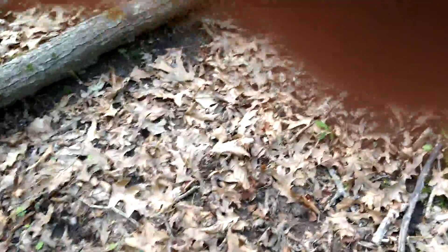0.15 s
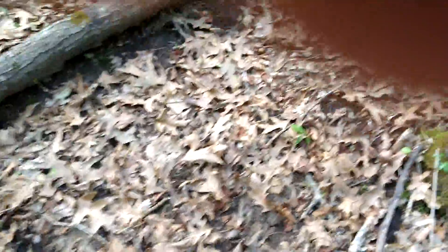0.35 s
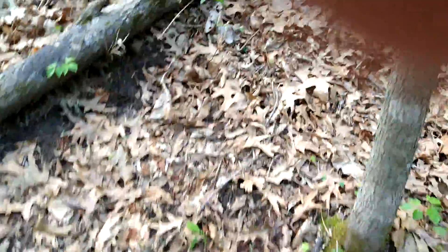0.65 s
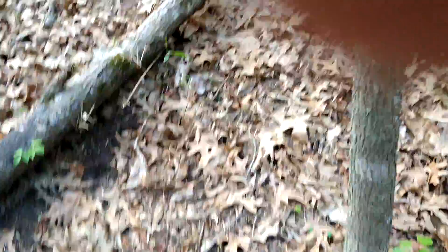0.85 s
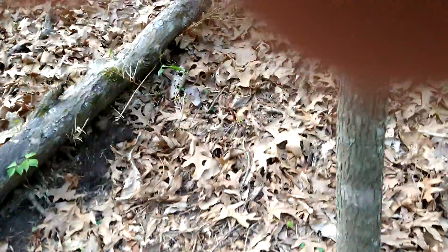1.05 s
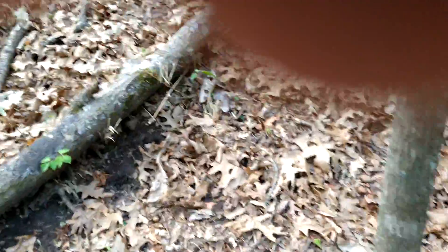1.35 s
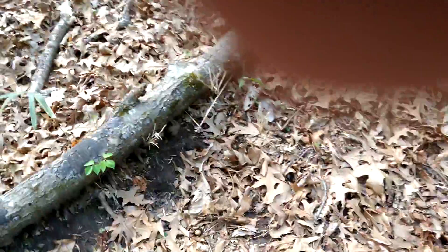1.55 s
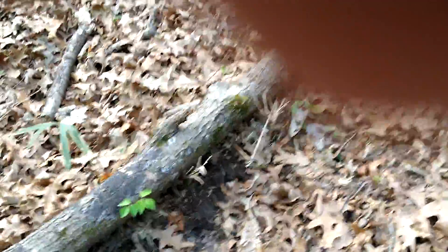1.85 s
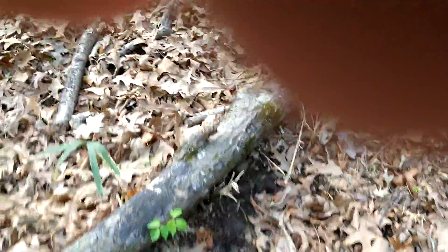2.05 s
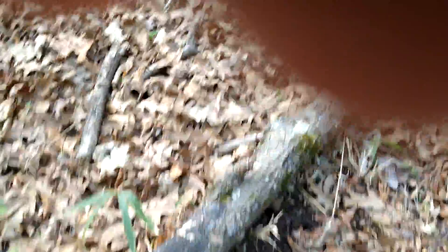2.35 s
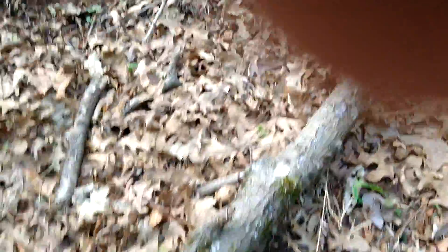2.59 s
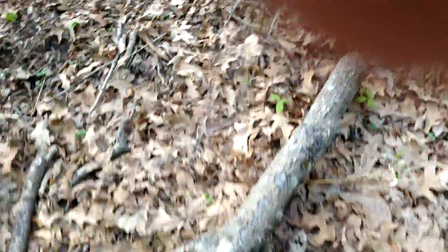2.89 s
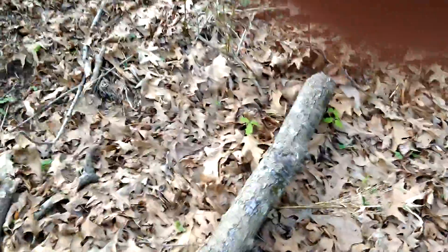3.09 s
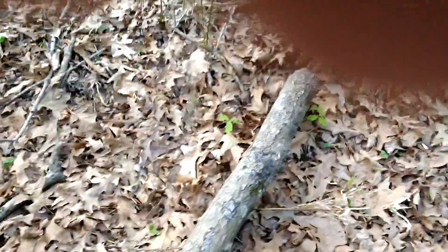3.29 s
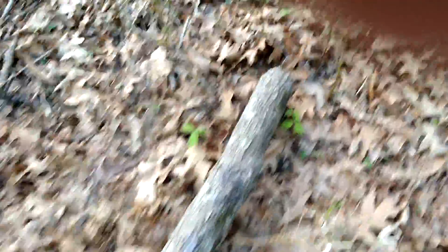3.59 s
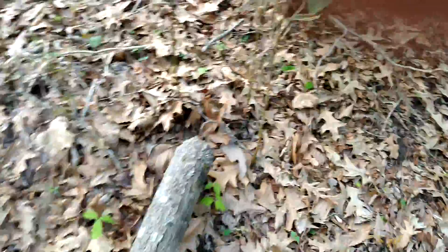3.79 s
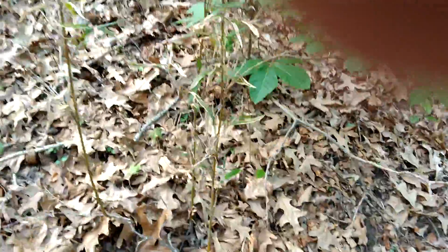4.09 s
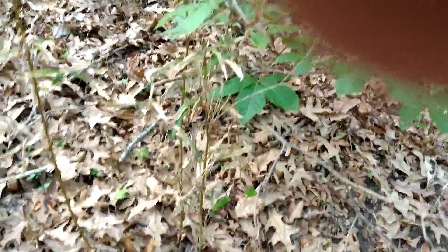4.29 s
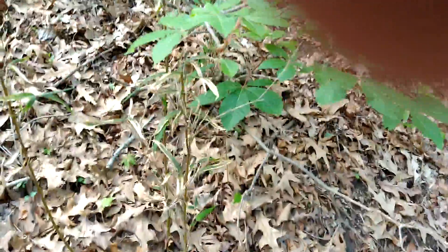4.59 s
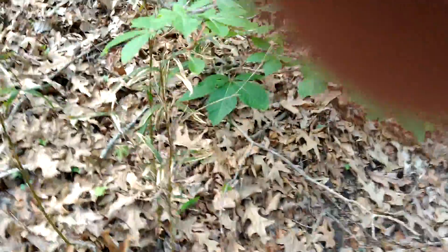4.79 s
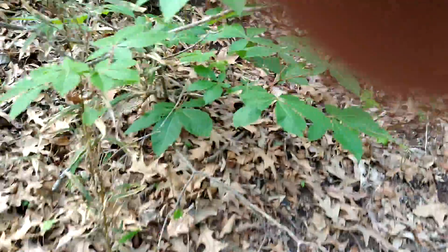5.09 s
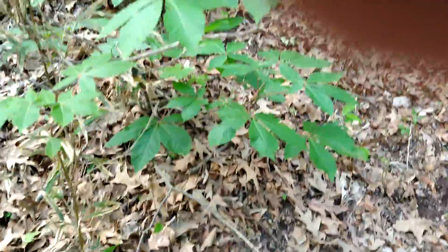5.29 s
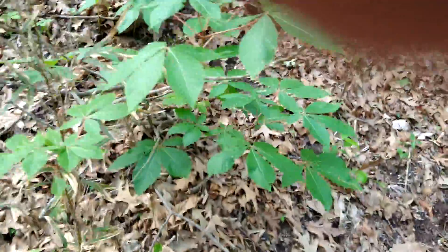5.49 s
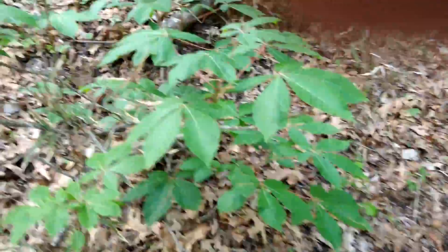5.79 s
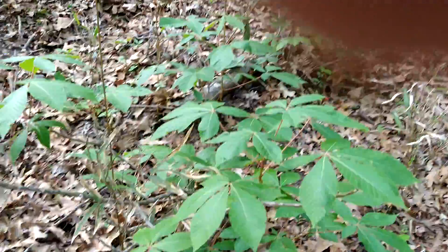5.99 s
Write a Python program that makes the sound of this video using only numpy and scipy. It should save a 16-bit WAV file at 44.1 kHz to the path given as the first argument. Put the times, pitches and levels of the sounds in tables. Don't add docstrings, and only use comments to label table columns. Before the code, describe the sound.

Feet crunch and drag through dry leaves, loud with sharp twig snaps at first, then lighter, scattered rustles and ticks in quiet woods.

```python
import sys
import numpy as np
from scipy import signal
from scipy.fft import rfft, irfft, next_fast_len
from scipy.io import wavfile
from scipy.ndimage import uniform_filter1d

SR = 44100
rng = np.random.default_rng(int(sys.argv[2]) if len(sys.argv) > 2 else 0)


def voltage_ratio(decibels):
    exponent = np.asarray(decibels, float) / 20
    return 10 ** exponent


def file_out(sig):
    cols = np.atleast_2d(sig).T
    lim = np.clip(cols, -1, 1)
    pcm = np.round(lim * 32767).astype(np.int16)
    wavfile.write(sys.argv[1], SR, pcm)


N = 271126
T = np.arange(N) / SR
M = next_fast_len(N)
HZ = np.fft.rfftfreq(M, 1 / SR)
SIDES = np.array([[.5], [-.5]])


def evened(x):
    return x / np.sqrt(np.mean(x ** 2) + 1e-20)


def read(points, hz):
    f, value = np.transpose(points)
    return np.interp(np.log(hz + 1), np.log(f + 1), value)


def bump(hz, center_hz, width):
    return np.exp(-(np.log((hz + 1) / center_hz) / width) ** 2)


def above(hz, edge_hz):
    return 1 / np.sqrt(1 + (edge_hz / (hz + 1)) ** 12)


def add(mix, s, sound):
    part = mix[:, round(s * SR):][:, :sound.shape[1]]
    part += sound[:, :part.shape[1]]


def drift(rate):
    slow = rfft(rng.standard_normal(M)) / (1 + (HZ / rate) ** 4)
    return evened(irfft(slow, M)[:N])


def pair(same):
    a, b = rfft(rng.standard_normal((2, M)))
    same = np.clip(read(same, HZ), 0, 1)
    return np.array([a, same * a + np.sqrt(1 - same ** 2) * b])


# pitch in Hz, level in dB per Hz.
AIR = [(25, -17), (60, -3.5), (140, 0), (340, -5.5), (630, -8), (930, -12.5), (3300, -15), (5200, -16),
       (7000, -24.5), (10000, -53.5), (15500, -20)]
# pitch in Hz, likeness from 0 to 1.
AIR_SAME = [(30, .2), (120, 1), (600, 0.5), (2000, 0.11)]


def air():
    hiss = irfft(pair(AIR_SAME) * voltage_ratio(read(AIR, HZ)), M)[:, :N]
    return voltage_ratio(-67 + 1.1 * drift(4.9)) * evened(hiss)


# time in seconds, level in dB.
HUM = [
    (0, -70),
    (.5, -73),
    (.65, -61.5),
    (1.0, -63.5),
    (1.3, -77),
    (1.5, -90),
    (1.85, -68),
    (2.3, -88),
]


def engine_hum():
    pitch_hz = 99 * (1 + 0.053 * drift(10))
    tone = np.sin(2 * np.pi * np.cumsum(pitch_hz) / SR)
    return tone * voltage_ratio(np.interp(T, *np.transpose(HUM)) + 4. * drift(18))


# time in seconds, pitch in Hz, level in dB.
CREAK = [
    (1.879, 352, -85),
    (1.948, 298, -59),
    (1.999, 313.4, -80),
    (2.049, 343, -64.5),
    (2.12, 457, -64),
    (2.2, 334, -67),
    (2.4, 291, -78),
]


def shoe_creak():
    s, hz, db = np.transpose(CREAK)
    pitch_hz = np.interp(T, s, hz) * (1 + 0.032 * drift(47))
    tone = np.sin(2 * np.pi * np.cumsum(pitch_hz) / SR)
    return tone * voltage_ratio(np.interp(T, s, db, -140, -140) + 4.5 * drift(25))


# start in seconds, peak level in dB, ring in Hz.
KNOCKS = [
    (0.048, -36, 945),
    (3.651, -42.5, 950),
    (5.073, -30, 360),
]


def knocks():
    out, t = np.zeros((2, N)), np.arange(2000) / SR
    # pitch over the ring, level in dB, seconds to fall by 60 dB
    modes = ((1.004, 1.0, 0.011), (0.48, -18.0, 0.031), (2.7, -8.0, 0.015))
    for s, db, hz in KNOCKS:
        wood = sum(np.sin(2 * np.pi * k * hz * t) * voltage_ratio(mode_db - 60 * t / t60) for k, mode_db, t60 in modes)
        wood = voltage_ratio(db + 5.0) * wood * np.clip(t / 0.0043, 0, 1)
        add(out, s, np.tile(wood, (2, 1)))
    return out


# pitch in Hz, likeness from 0 to 1.
SAME = [(40, .4), (200, 1), (600, 0.85), (1100, 0.5), (2000, 1), (3000, 1), (5000, 0.24), (10000, 0.031)]


def crack(ring_hz, ring_db, t60, lag, size=1024):
    t, hz = np.arange(size) / SR - .001, np.fft.rfftfreq(size, 1 / SR)
    tail = voltage_ratio(-60 * t / t60) + 0.61 * np.exp(-t / 0.00049)
    burst = rng.standard_normal((2, size)) * np.clip(t / 0.0001, 0, 1) * tail
    r = np.exp(-np.pi * .22 * ring_hz / SR)
    ring = signal.lfilter([1], [1, -2 * r * np.cos(2 * np.pi * ring_hz / SR), r * r], burst)
    left, other = rfft(evened(burst) + voltage_ratio(ring_db) * evened(ring))
    same = np.clip(read(SAME, hz), 0, 1)
    late = np.exp(-2j * np.pi * lag * hz / SR)
    right = same * left * late + np.sqrt(1 - same ** 2) * other
    return np.array([left, right])


# pitch in Hz, level in dB per Hz.
LEAF = [(24, -60), (40, -33), (98, -7), (183, -21.5), (461, -14), (591, -17.5), (859, -11), (1640, -8.5),
        (1770, -5), (3930, 1), (6010, -0.5), (8520, 2), (12400, -7.5), (15500, -16)]
# start in seconds, peak level in dB, ring in Hz, left over right in dB.
TWIGS = [(.007, -36, 3700, 12), (.0479, -20, 3120, 8), (.1855, -35, 2740, 8), (.2198, -36, 2140, 14.5),
         (.3123, -31, 2970, 8), (.6693, -23, 4170, -12), (.7273, -11.5, 2960, 12), (.765, -20, 4570, 15),
         (.9513, -20, 3140, 11), (.9889, -17, 1710, 9), (1.1193, -19.5, 2360, 8), (1.1562, -20, 2860, 17),
         (1.179, -18, 3100, 10), (1.2777, -39, 3500, 13), (1.31, -20.5, 3160, 9), (1.3774, -50, 5080, 7),
         (1.6176, -20, 3360, 22), (1.732, -17.5, 2950, 20), (1.7622, -14.5, 2980, 13),
         (1.872, -14.5, 1870, 7), (2.1536, -15, 3780, 11.5), (2.4463, -36.5, 2870, 12),
         (2.8659, -24.5, 2450, 16.5), (3.4968, -44, 4300, 34), (4.4004, -43.5, 2740, 8),
         (4.618, -52, 4000, 3), (5.075, -21, 3740, 4), (5.195, -34, 2100, 10), (5.989, -36.5, 3060, 19),
         (6.0345, -38, 2440, 6)]
STALKS = [(.0936, -21, 11000, 13), (.1437, -11, 11100, 14), (.4187, -29, 9300, 17), (.5512, -12, 9000, 0),
          (.794, -7, 9400, 18), (.9165, -13.5, 9000, 0), (.9344, -27, 8230, 3), (.9644, -15, 7190, 1),
          (1.3895, -44, 8310, 7), (1.5325, -29, 8200, 6), (1.886, -14.5, 7540, 0), (1.9648, -5.5, 8400, 24),
          (1.9991, -4, 8900, 8), (2.0637, -7, 6000, 15), (2.1818, -14.5, 7850, 12), (2.2376, -44, 8350, 4),
          (3.052, -22.5, 8600, 13), (3.223, -32, 9800, 11), (3.6521, -16.5, 6460, 15),
          (3.8742, -43, 8200, 10), (4.4328, -34.5, 6700, 15), (4.4838, -40.5, 6680, 13),
          (4.5021, -29.5, 6840, 14.5), (4.7422, -15.5, 8700, 7), (4.8219, -21, 5830, 1),
          (4.919, -27.5, 9300, 11), (5.139, -16, 9500, 4), (5.2588, -27, 8200, 9), (5.3917, -47, 7580, -7),
          (5.6368, -20.5, 9100, 6)]
STEMS = [(.065, -19, 6900, 13), (.125, -26, 7850, 15), (.2508, -34, 6700, 16), (.2983, -28, 6630, 16),
         (.5015, -19, 7500, 13), (1.0077, -21, 10200, -7), (1.2005, -18, 6800, 13), (1.244, -26, 6300, -4),
         (1.7903, -15.5, 8100, 10), (1.839, -8.5, 7360, 6), (2.2196, -32, 8050, 14),
         (2.3208, -27, 7150, 18), (2.4066, -23.5, 6400, 10), (2.6013, -36, 8100, 16),
         (2.7116, -20, 10600, 15), (2.8995, -23.5, 8400, 11), (2.9261, -24, 11540, 15),
         (2.9972, -21.5, 7260, 10), (3.0171, -21, 8350, 13), (3.8165, -29, 8400, 20), (3.916, -28, 8230, 9),
         (3.946, -18, 8500, 8), (4.0626, -21, 8150, 14), (4.108, -18, 6640, 9), (4.9883, -25, 11200, -6.5),
         (5.1198, -18, 9500, -4), (5.273, -22, 8350, 11), (5.532, -30, 8660, 9), (5.9214, -19, 7600, 14),
         (.7104, -10, 8470, 6.5), (5.1915, -24, 9500, 7), (5.004, -26, 9290, 9), (3.2499, -36.5, 8850, 15),
         (5.9583, -29, 8000, 12), (.356, -34, 11000, 12), (.04, -42, 9000, 14), (5.0905, -24, 11500, 7),
         (5.966, -24, 7400, 20)]
RIBS = [(0.0652, -40.5, 2910, -2), (0.16, -28, 4050, 10), (0.3382, -38, 3190, 15), (0.3902, -42, 4030, 8),
        (0.4621, -42, 2370, 23), (0.6058, -6, 2950, 14), (0.7752, -9, 3040, 19), (0.7994, -17, 3640, 14),
        (0.8229, -20, 3770, 6), (0.8773, -15, 4400, 3), (0.9139, -12.5, 4800, 2), (0.9649, -22, 2660, 15),
        (1.0292, -22, 3300, 10), (1.2005, -24, 2840, 11), (1.3641, -51, 3490, 13), (1.4961, -35.5, 2200, 9),
        (1.6283, -16, 3450, 13), (1.8929, -18, 3500, 10), (1.9158, -19, 4780, 10), (1.9387, -21, 3940, 4),
        (1.9944, -15, 4700, 20), (2.0844, -15.5, 3490, 12), (2.1155, -22, 4050, 17), (2.2899, -24, 2920, 7),
        (2.4049, -43, 3650, 12), (2.7125, -35, 3430, 10), (2.7216, -32, 3190, 15), (2.7587, -45, 2130, 14),
        (2.9276, -38, 2650, 17), (3.0183, -36, 3140, 11), (3.4237, -43, 2580, 14), (3.6673, -34, 3570, 9),
        (3.8751, -41, 4030, 8), (4.0116, -41, 3400, -2), (4.2427, -41, 3250, 15.5), (4.4482, -45, 2510, 8),
        (4.7692, -26.5, 3750, 8), (4.9691, -32, 3830, 11), (5.1129, -35, 3680, 17), (5.1235, -32, 3960, 9),
        (5.1646, -27.5, 3800, 14), (5.3939, -33, 3250, 6), (5.6656, -49, 4070, 12), (6.0142, -38, 3340, 10)]
EDGES = [(0.1861, -37, 10400, 11), (0.2202, -49, 7110, 12), (0.337, -44, 8610, 15), (0.6041, 0, 8900, 4),
         (0.7274, -6, 7650, 7), (0.753, -22, 8290, 8), (0.7614, -10, 10510, 11), (0.7651, -17, 8180, 5),
         (0.7767, -20, 7990, 6), (0.8215, -13, 8030, 8), (0.8368, -13, 7450, 9), (0.9346, -20, 7560, 2),
         (1.0029, -11, 9130, 2), (1.0712, -13, 6420, 6), (1.3776, -38, 8160, 3), (1.3895, -25.5, 8270, 11),
         (1.4461, -30, 8610, 0), (1.458, -33, 8180, 3), (1.7661, -12.5, 7800, 18), (1.8862, -16, 7450, 10),
         (1.907, -23, 11280, 7), (1.9863, -13, 8330, 17), (2.1611, -17, 7470, 12), (2.2368, -48, 8350, 8),
         (2.6502, -28, 8440, 8), (2.7203, -22, 8420, 14), (2.7292, -23.5, 10420, 11),
         (3.6218, -22, 8700, 15), (3.8105, -37, 7950, 13), (3.8322, -30, 7840, 15), (3.9031, -39, 8610, 2),
         (3.9223, -25, 7700, 8), (3.9562, -23, 8530, 5), (4.0002, -23, 8270, 10), (4.4941, -37, 6080, 19),
         (4.6174, -41, 7880, 8.5), (4.7383, -21, 7640, 13), (4.9538, -43, 9000, 2), (5.032, -20.5, 8570, 4),
         (5.0961, -28, 9690, 8), (5.1052, -18, 8050, 10), (5.2007, -20, 9000, 6), (5.2635, -27.5, 8870, 14),
         (5.295, -46, 8480, 12), (5.3562, -37, 11630, 5), (5.392, -35, 9050, -1), (5.6641, -39, 11330, 6),
         (5.78, -27, 7770, 14), (5.9757, -29, 8420, 10), (6.0369, -35, 8140, 12)]


def snaps():
    out, hz = np.zeros((2, N)), np.fft.rfftfreq(1024, 1 / SR)
    thwack_top_hz, tick_foot_hz = 5200, 6100
    high, low = above(hz, tick_foot_hz), 1 - above(hz, thwack_top_hz)
    late = np.exp(-2j * np.pi * hz * 0.000795)
    brighter = voltage_ratio(0.92 * hz / 1000)
    # breaks, thwack over tick in dB
    kinds = ((TWIGS, 7.5), (STALKS, -3.5), (STEMS, -14.5), (RIBS, 6.5), (EDGES, -16))
    for s, db, ring_hz, pan_db, coarse_db in [(*row, c) for rows, c in kinds for row in rows]:
        t60 = 0.0068 * (8000 / ring_hz) ** 0.71 * rng.uniform(.8, 2.6)
        ring_db = -2.0 if ring_hz > thwack_top_hz else 2.5
        z = crack(ring_hz, ring_db, t60, rng.uniform(-5.5, 1.3))
        z = z * voltage_ratio(read(LEAF, hz)) * hz / (hz + 540.0)
        body = low * np.sqrt(above(hz, 0.36 * min(ring_hz, 2600)))
        tick = evened(irfft(z * high * brighter))
        thwack = evened(irfft(z * body * late))
        sound = tick + voltage_ratio(coarse_db - 5.0) * thwack
        sound /= abs(sound).max(axis=1, keepdims=True)
        add(out, max(s - .0012, 0), voltage_ratio(db - 4.5 + SIDES * (pan_db - 11.5)) * sound)
    return out


# start in seconds, fine crackle in dB, rise in seconds, hold in seconds, fall in seconds.
STEPS = [(.06, -51, 0.18, .025, 0.06), (.56, -32.5, 0.094, .025, 0.035), (.593, -24.5, 0.056, 0.04, 0.045),
         (.772, -29, .04, 0.024, .06), (.74, -31.5, 0.14, 0.083, 0.42), (1.07, -36, 0.14, 0.02, 0.15),
         (1.19, -45.5, 0.36, 0.0071, 0.034), (1.40, -55.5, 0.037, 0.039, 0.087),
         (1.625, -35, 0.087, 0.12, 0.067), (1.84, -36, .1, 0.27, 0.1), (2.262, -45, 0.042, 0.035, 0.07),
         (2.65, -38.5, .04, 0.0069, 0.044), (2.69, -44, 0.03, 0.025, 0.031),
         (2.87, -53.5, 0.052, .03, 0.23), (2.995, -50.5, 0.057, .005, 0.094),
         (3.252, -55, .02, 0.086, 0.13), (3.60, -40.5, 0.087, 0.025, 0.21),
         (3.69, -60.5, 0.049, 0.039, 0.05), (3.76, -59.5, .1, 0.042, .06), (3.878, -55, 0.014, 0.025, 0.23),
         (4.0, -47, 0.29, 0.019, 0.21), (4.175, -44.5, 0.15, 0.025, 0.074),
         (4.758, -33.5, .045, 0.0081, 0.047), (4.8, -48.5, .03, .02, 0.037),
         (4.975, -61.5, 0.037, .02, .05), (5.008, -51.5, 0.026, .03, 0.28), (5.11, -45.5, .2, 0.087, 0.11),
         (5.36, -54, 0.26, .13, .06), (5.80, -39, 0.14, .008, 0.12), (5.89, -47, 0.033, 0.022, 0.098)]
# time in seconds, level in dB, fall in seconds.
STIRS = [(0.154, -52.5, 0.085), (.24, -61, 0.16), (.33, -58, 0.18), (.47, -58.5, 0.1), (0.671, -28, 0.1),
         (2.383, -51, .09), (2.55, -65, 1), (2.79, -57, 0.25), (1.301, -56, 0.18), (4.62, -66, .08),
         (3.465, -66, .05), (3.50, -72, 0.32), (4.493, -66, 0.026), (4.25, -51, 0.098), (4.50, -69.5, 0.45),
         (4.90, -69.5, 0.29), (5.549, -52.5, 0.05), (5.63, -75.5, 0.22), (5.975, -58, 0.049),
         (6.14, -68.5, 0.15)]


def tread(t):
    swing_db = 22.5
    rows = STEPS + [(s, db, 0.88 * fall, 0, fall) for s, db, fall in STIRS]
    s, db, rise, hold, fall = np.transpose(rows)[:, :, None]
    away = np.maximum(s - t, 0) / abs(rise) + np.maximum(t - s - hold, 0) / abs(fall)
    return 10 * np.log10(np.sum(voltage_ratio(db - swing_db * away) ** 2, 0) + 1e-10)


# time in seconds, coarse crunch over the fine in dB,
# coarse leaf pitch in Hz, fine leaf pitch in Hz, share of brushing from 0 to 1.
LITTER = [(.1, -0.7, 3260, 7000, 0.9), (.3, 4, 3200, 7000, .6), (.47, -3.5, 2980, 8060, 0.33),
          (.6, 0, 3100, 9400, 0), (.8, 2.5, 3750, 9300, 0.4), (.95, 1.5, 3600, 8000, 0.23),
          (1.08, -3, 3320, 6450, 0.48), (1.22, 0, 2800, 7060, .3), (1.4, 3.5, 3060, 7860, 0.1),
          (1.63, -1.5, 2950, 8000, 0.18), (2.05, -1.5, 3900, 7700, 0), (2.28, -3, 2860, 6600, 0.25),
          (2.68, -0.3, 3460, 8450, 0), (2.95, -0.5, 2400, 8000, 0.26), (3.2, -2, 2340, 7000, 0.2),
          (3.298, -2.5, 2200, 6400, 0.5), (3.4, -1, 2300, 6400, .65), (3.47, 4, 3900, 6900, 0.3),
          (3.55, -0.8, 3820, 8300, 0.57), (4.0, -7.5, 3420, 7900, 0.73), (4.2, -9.5, 3970, 6000, 1),
          (4.76, -1.5, 3140, 7960, 0.26), (4.98, -1, 4000, 9300, 0.1), (5.12, -8.5, 4070, 9600, 0.05),
          (5.25, -3, 3450, 8500, .3), (5.45, -5, 3600, 8900, 0.7), (5.7, -3, 3500, 7950, 0.63),
          (5.82, -11.5, 2620, 8450, 0.64), (5.95, -2, 3120, 7950, 1), (6.1, 5.5, 3020, 8050, 0.7)]
# pitch in Hz, level in dB per Hz.
BRUSH = [(180, -17), (300, -19.5), (849, -15), (1200, -21), (1510, -20.5), (2740, -12), (4800, -19),
         (5480, -16), (6460, -4.5), (8280, -6), (9600, -17.5), (15500, -25)]
# time in seconds, extra low body in dB.
LANDINGS = [
    (.85, 1),
    (1.68, 1.5),
    (2.28, -13),
    (2.66, 4.5),
    (3.3, -1),
    (3.64, 2),
    (4.76, 4.5),
    (5.62, 2),
]


def litter_colour(t, hz):
    s, *columns = np.transpose(LITTER)
    coarse_db, coarse_hz, fine_hz, brushing = (np.interp(t, s, c) for c in columns)
    push_db = np.clip(tread(t) + 45, -30, 30)
    fizz_db = -2 + 1.5 * (fine_hz / 1000 - 8) - 0.1446 * push_db
    soil_db = -25 - 0.1166 * push_db
    soil_db = soil_db + sum(db * np.exp(-((t - at) / 0.079) ** 2) for at, db in LANDINGS)
    hz, brushing = hz[:, None], np.clip(brushing, 0, 1)
    shape = voltage_ratio((1 - brushing) * read(LEAF, hz) + brushing * read(BRUSH, hz))
    shape *= voltage_ratio((1.0 + 7.3 * brushing) * bump(hz, coarse_hz, 0.25))
    shape *= voltage_ratio((3.5 + 1.6 * brushing) * bump(hz, fine_hz, 0.17))
    steps = [1] + [above(hz, edge) ** 2 for edge in (950, 5500, 10000)] + [0]
    ranges = [shape * np.sqrt(abs(a - b)) for a, b in zip(steps, steps[1:])]
    levels = (soil_db, coarse_db, 0, fizz_db)
    power = [(voltage_ratio(db) * g) ** 2 / np.sum(g ** 2, 0) for db, g in zip(levels, ranges)]
    patches = rng.standard_normal((len(hz), len(t)))
    patches = evened(uniform_filter1d(uniform_filter1d(patches, size=12, axis=0), size=16, axis=1))
    shadow_db = -5.0 * brushing * bump(hz, 5350, .06)
    return np.sqrt(sum(power) * len(hz)) * voltage_ratio(1.37 * patches + shadow_db)


def leaves(count=28):
    pressure_db = np.interp(T, T[::64], tread(T[::64]))
    per_s = 1300 * voltage_ratio(.55 * (pressure_db + 46.5))
    happens = rng.random(N) < per_s / SR
    size = voltage_ratio(4.5 * np.minimum(rng.exponential(1, N), 2.6)) * happens / np.sqrt(per_s)
    kind, grains = rng.integers(0, count, N), np.zeros((2, N))
    for k, hz in enumerate(np.geomspace(700, 14000, count)):
        shape = irfft(crack(hz, -5.0, rng.uniform(0.001, 0.029), rng.uniform(-9.5, 0.62)))
        grains += signal.oaconvolve((size * (kind == k))[None], shape, axes=1)[:, :N]
    z = rfft(grains, M)
    z /= np.sqrt(uniform_filter1d(abs(z) ** 2, size=3001))
    rustle = evened(irfft(pair(SAME), M))
    crackle = evened(irfft(z, M)) + voltage_ratio(-2.0) * rustle
    clumps_db = 0.81 * drift(29.4) + 0.75 * drift(200)
    crackle = evened(crackle[:, :N] * voltage_ratio(clumps_db))
    hz, t, z = signal.stft(crackle, SR, nperseg=512, noverlap=384)
    coloured = signal.istft(z * litter_colour(t, hz), SR, nperseg=512, noverlap=384)[1][:, :N]
    return voltage_ratio(pressure_db + 1.0) * coloured


def scene():
    background = air() + engine_hum() + shoe_creak()
    foot = knocks() + snaps() + leaves()
    foot = irfft(rfft(foot, M) * above(HZ, 60), M)[:, :N]
    return background + foot


def band_limit(x):
    return signal.sosfilt(signal.butter(12, 16990, fs=SR, output="sos"), x)


# pitch in Hz, left over right in dB.
PORTS = [(40, 4), (250, 0), (500, 1.5), (1000, 1), (1900, 6.5), (3300, 9.5), (5500, 4.5), (9000, 3),
         (15000, -2.5)]
# pitch in Hz, lead of the left port in radians.
DETOUR = [(1100, 0.41), (2200, -0.95), (3300, -3.5), (4000, -4), (15000, -21)]


def record(dry):
    ports = voltage_ratio(SIDES * read(PORTS, HZ)) * np.exp(1j * SIDES * read(DETOUR, HZ))
    edge = voltage_ratio(np.interp(HZ, [15700, 15900, 16600, 17000], [0, -28, -40, -46]))
    return band_limit(irfft(rfft(dry, M) * ports * edge, M)[:, :N])


dry = scene()
out = record(dry)
file_out(out)
```